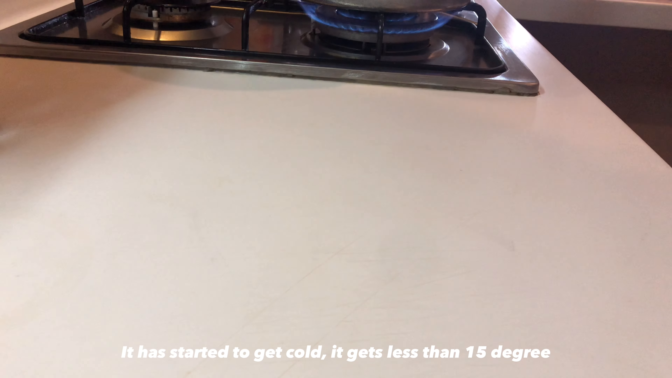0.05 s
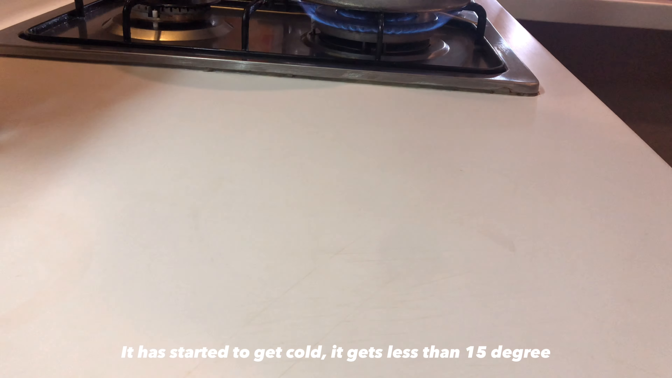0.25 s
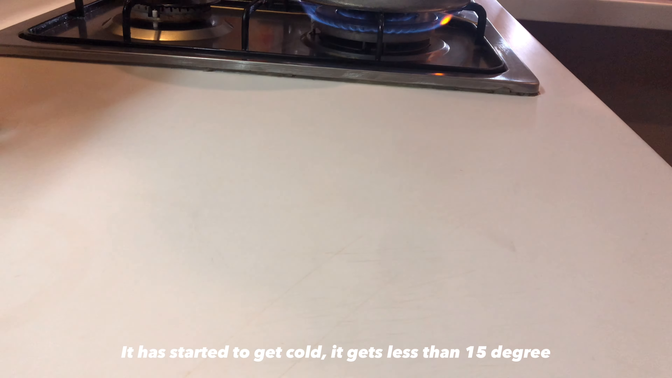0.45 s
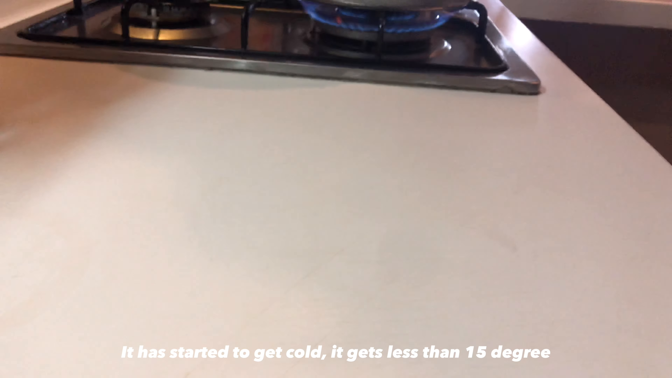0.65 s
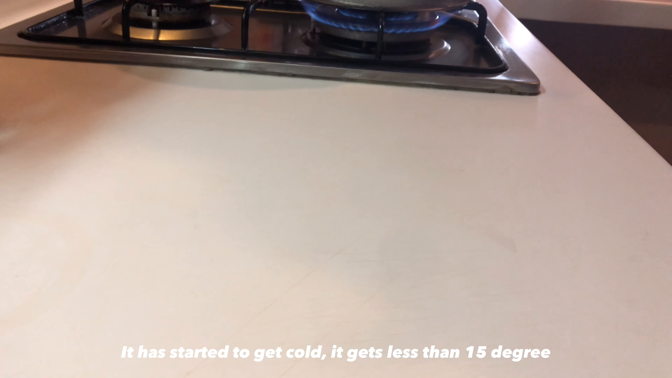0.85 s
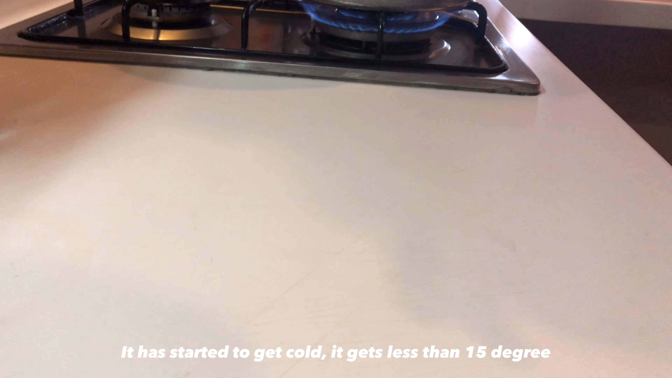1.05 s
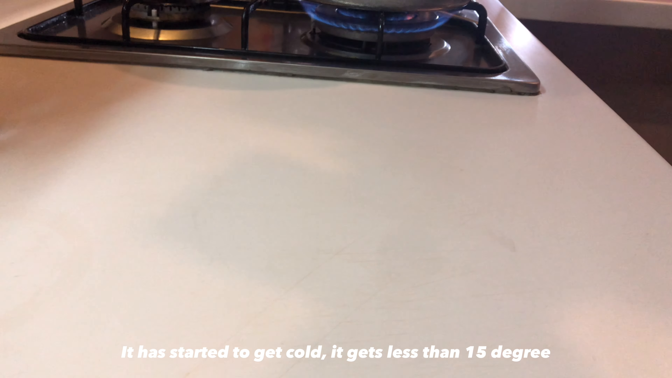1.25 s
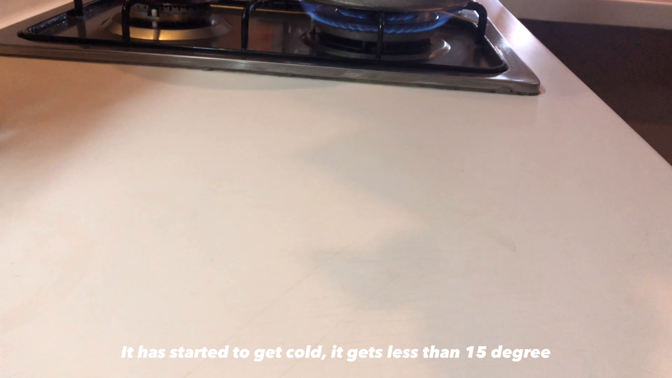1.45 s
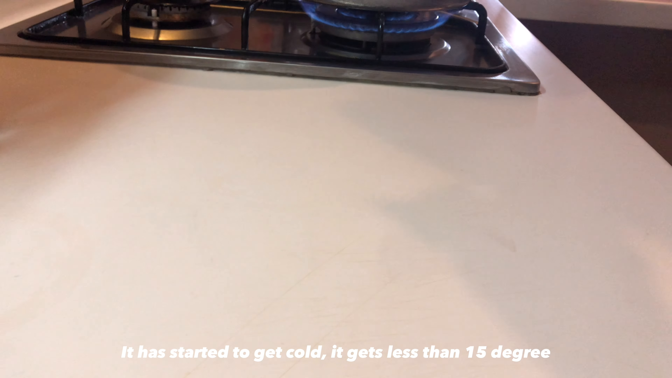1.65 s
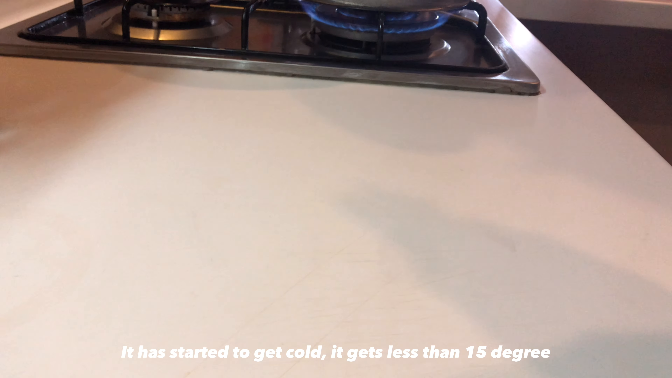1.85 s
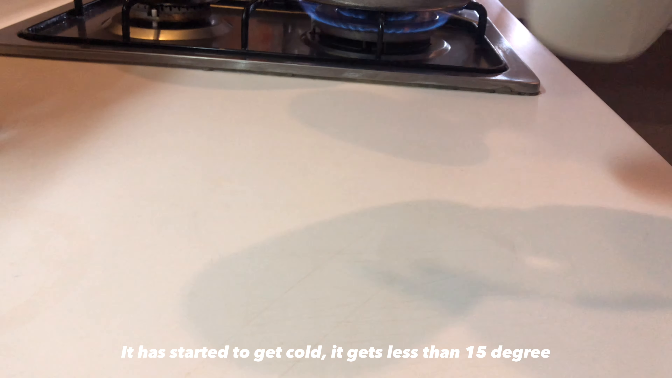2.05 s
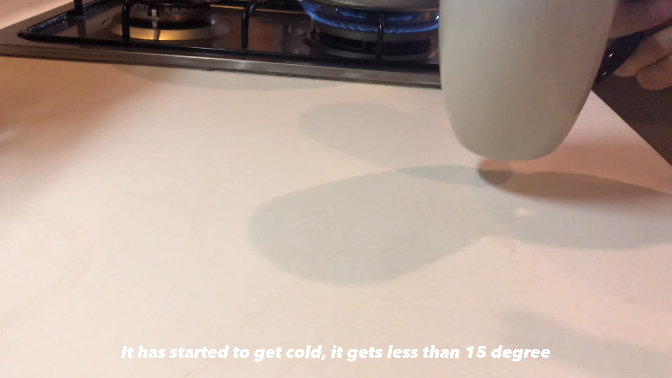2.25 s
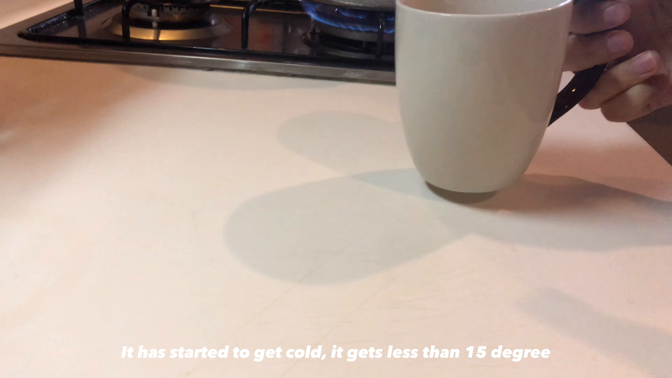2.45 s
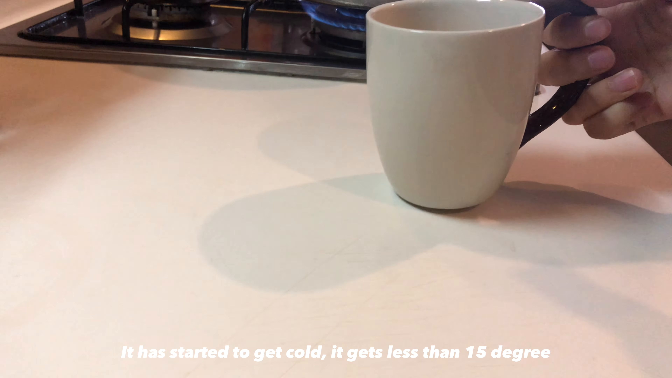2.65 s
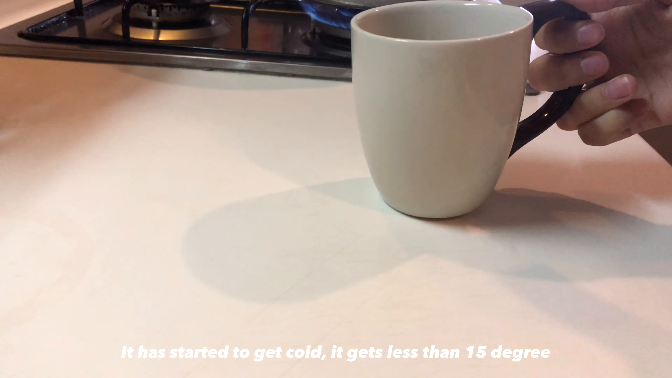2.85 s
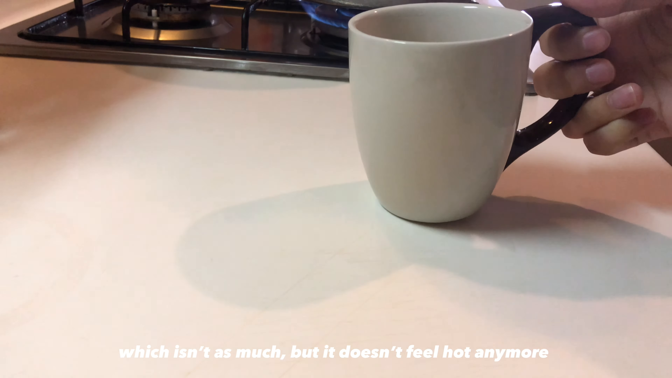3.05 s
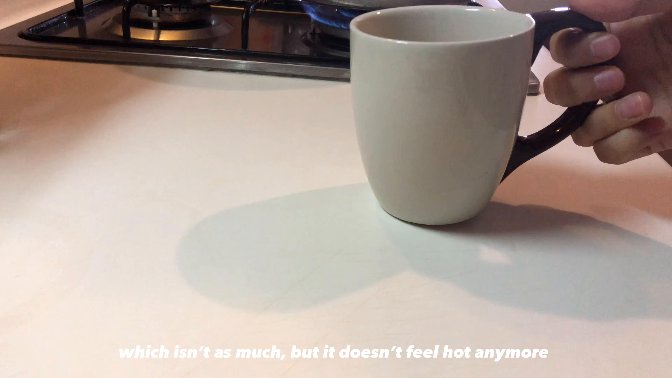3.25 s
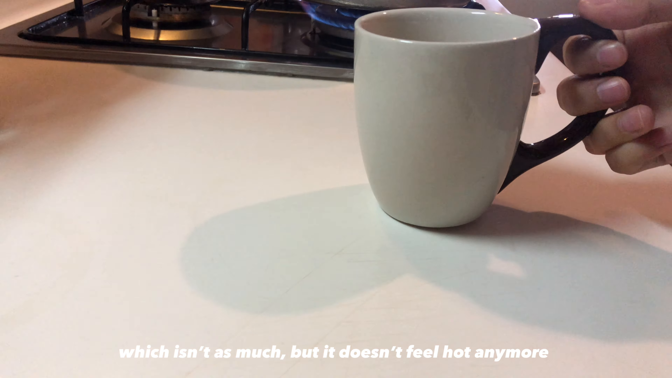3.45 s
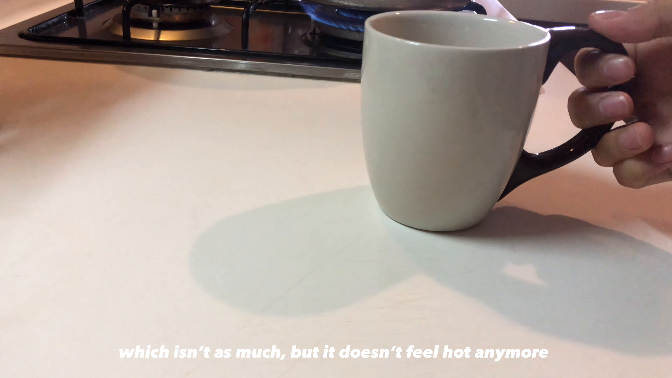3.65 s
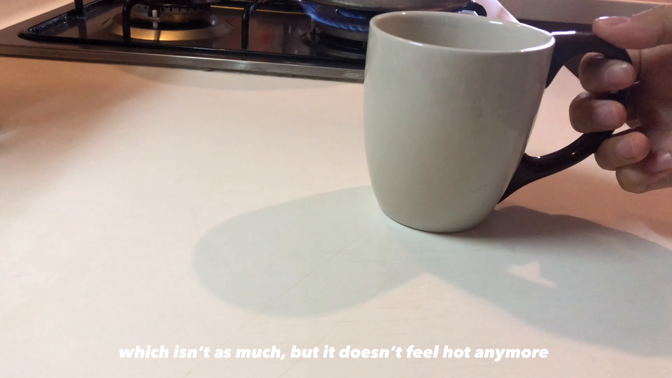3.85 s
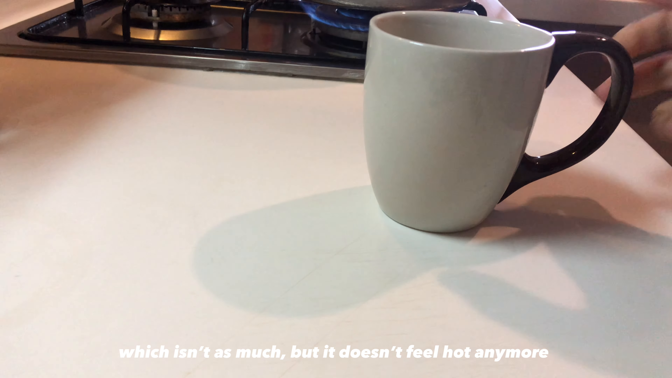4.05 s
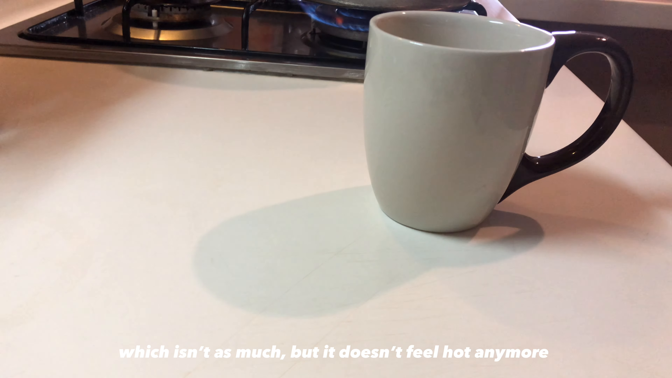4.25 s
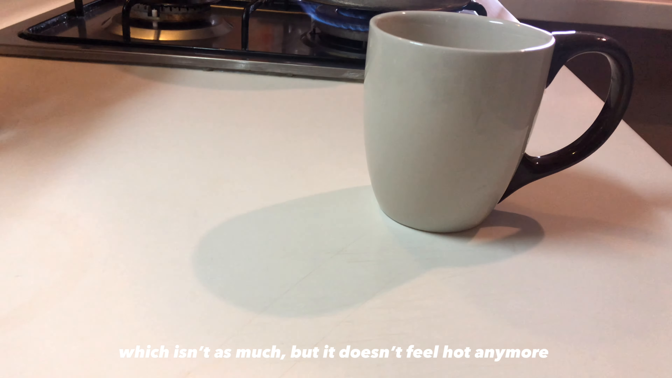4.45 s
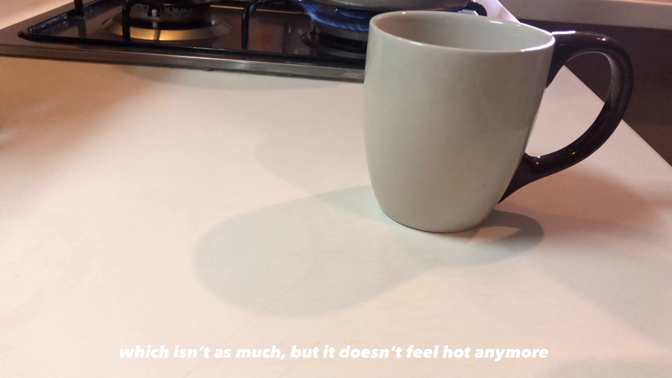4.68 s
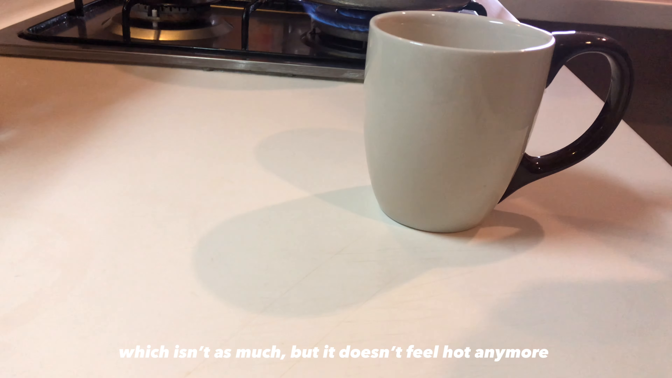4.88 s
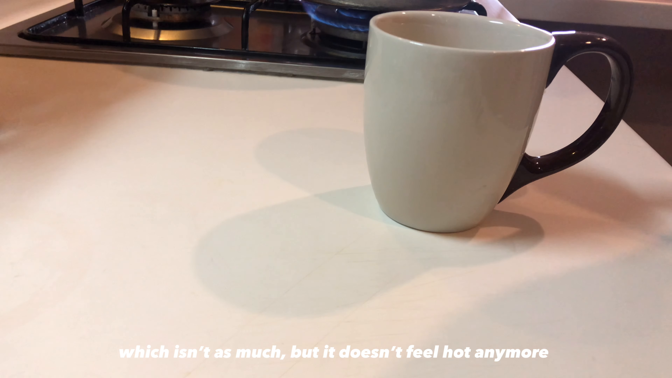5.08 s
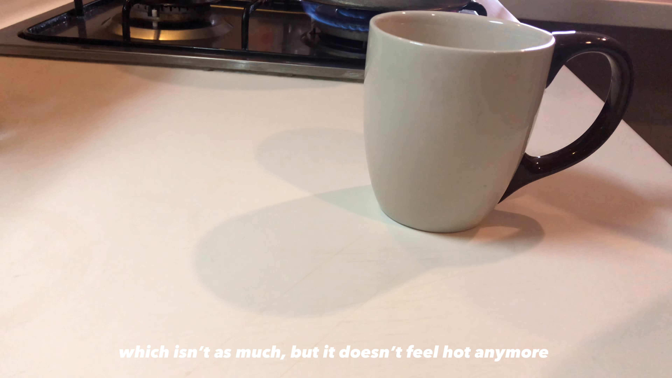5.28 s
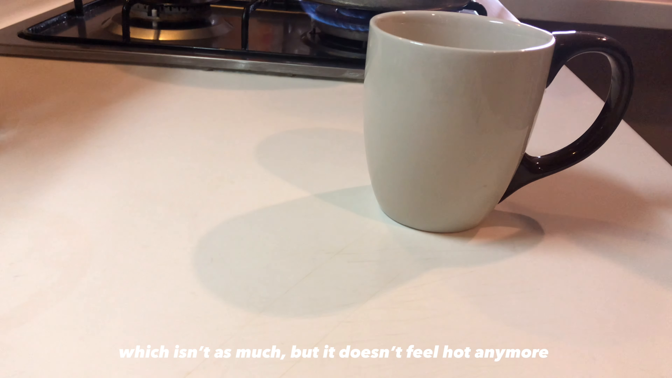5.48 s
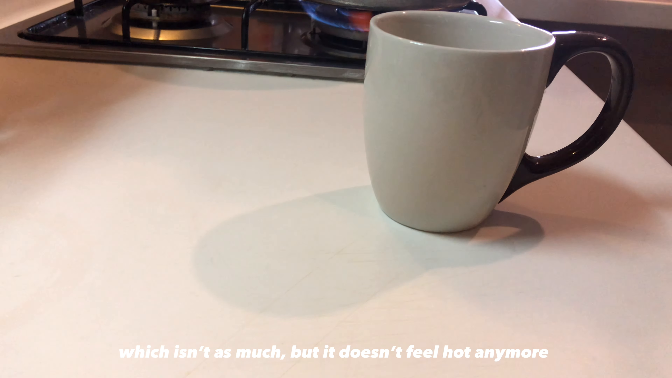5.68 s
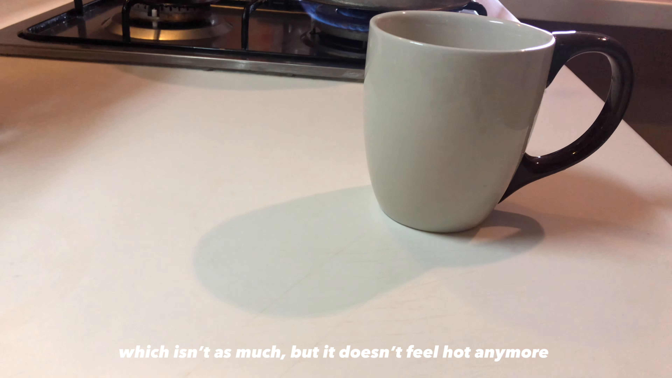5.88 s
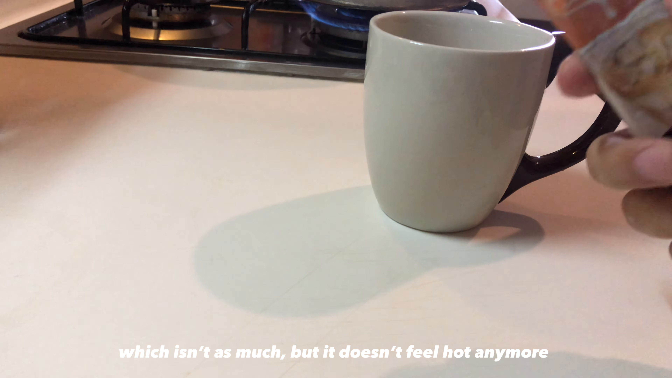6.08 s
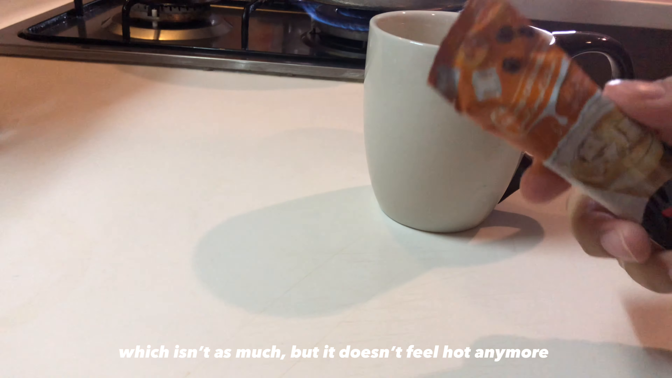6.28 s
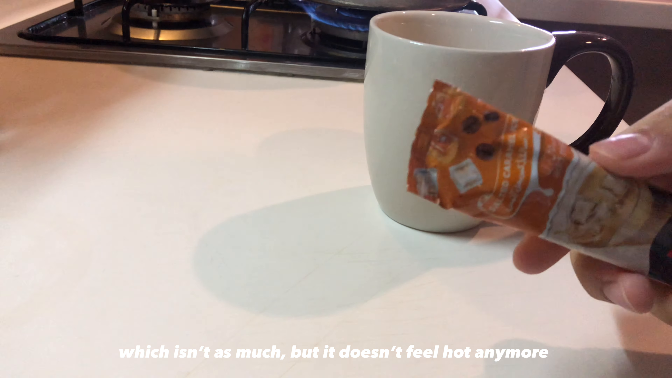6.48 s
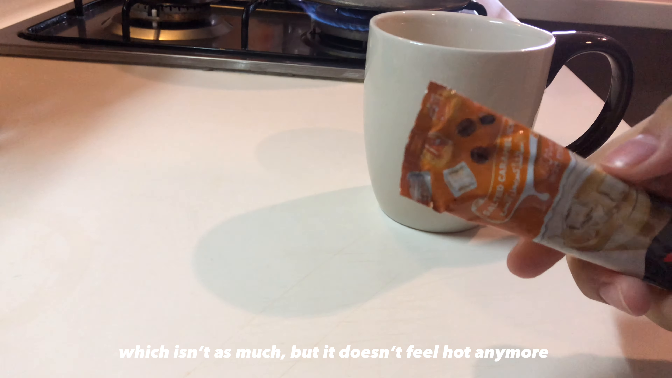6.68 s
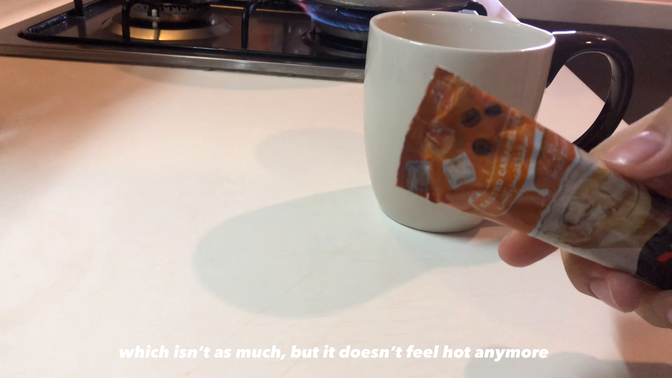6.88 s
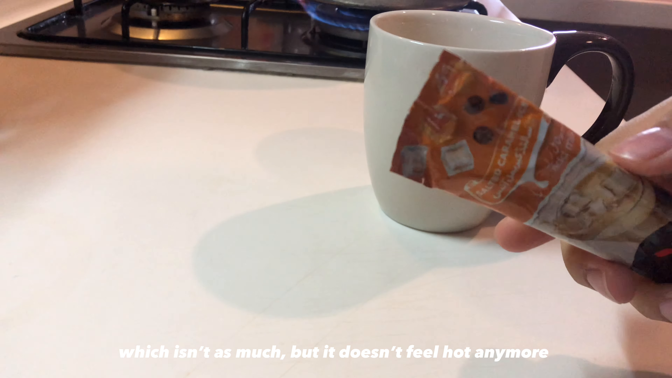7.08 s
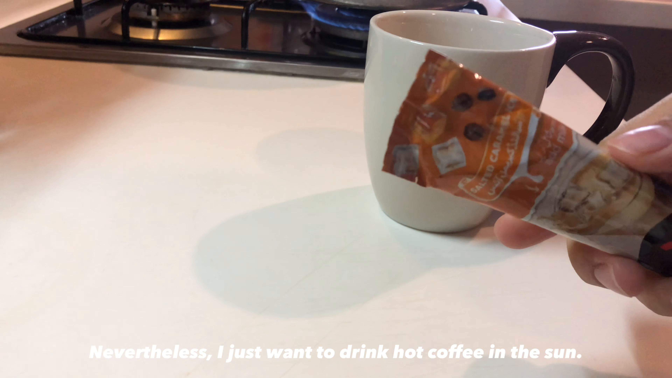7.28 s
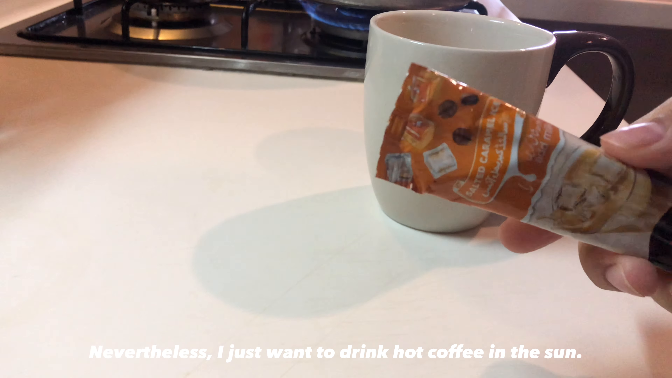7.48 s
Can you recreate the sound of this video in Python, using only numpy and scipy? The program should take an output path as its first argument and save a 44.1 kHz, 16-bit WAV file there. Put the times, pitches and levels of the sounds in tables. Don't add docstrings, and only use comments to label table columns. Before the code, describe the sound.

Close microphone on a kitchen counter, with a gas flame hissing evenly beyond it. Small crisp ticks and a dull knock lead to a mug's edge landing sharply, making the slab ring and the room answer briefly. Its whole base settles more quietly with a tiny bounce. Faint low bumps follow, then a crushed foil sachet crackles brightly in the hand and dwindles to occasional snaps.

```python
import sys
import numpy as np
from scipy import signal
from scipy.fft import rfft, irfft
from scipy.io import wavfile
from scipy.ndimage import uniform_filter1d

SR = 44100
rng = np.random.default_rng(int(sys.argv[2]) if len(sys.argv) > 2 else 0)


def how_loud(loudness_db):
    steps = np.asarray(loudness_db, float) / 20
    return 10 ** steps


def waveform_to_disk(signal):
    frames = np.transpose(np.atleast_2d(signal))
    scaled = np.clip(frames, -1, 1) * 32767
    samples = np.round(scaled).astype(np.int16)
    wavfile.write(sys.argv[1], SR, samples)


N = 331894

# f/Hz, t60/s
ROOM_DECAY = [(60, 0.97), (300, 0.89), (1000, 0.7), (2000, 0.33), (5000, 0.31), (12000, 0.23)]


def read(points, hz):
    f, value = np.transpose(points)
    return np.interp(np.log(hz + 1), np.log(f + 1), value)


def peak(hz, centre_hz, width_hz):
    return 1 / (1 + (2 * (hz - centre_hz) / width_hz) ** 2) ** 2


def add(mix, s, sound):
    part = mix[round(s * SR):][:len(sound)]
    part += sound[:len(part)]


def evened(x):
    return x / np.sqrt(np.mean(x ** 2) + 1e-20)


def coloured(noise, gain):
    return evened(irfft(rfft(noise) * gain, len(noise)))


def swelling_mode(t, db, hz, t60, rise_ms):
    rise = 1 - np.exp(-t * 1000 / rise_ms)
    return how_loud(db - 60 * t / t60) * rise * np.sin(2 * np.pi * hz * t)


def echoes(decays, gap_ms, size):
    spacing = 12
    taps = np.zeros(size)
    starts = np.arange(0, size - spacing, spacing)
    at = starts + rng.integers(0, spacing, len(starts))
    taps[at] = rng.choice([-1., 1.], len(at))
    hz, t, bands = signal.stft(taps, SR, nperseg=128)
    dying = bands * how_loud(-60 * t / read(decays, hz)[:, None])
    tail = signal.istft(dying, SR, nperseg=128)[1]
    return np.r_[np.zeros(round(gap_ms * SR / 1000)), tail / np.linalg.norm(tail)]


def burner():
    # f/Hz, density/dB per Hz
    jet_hiss = [(560, -29.0), (1400, -19.7), (2300, -18.7), (3600, -25), (4600, -16.5), (6000, -28.5),
                (7500, -23.0), (11000, -29.0), (13000, -28.5), (15700, -24.7)]
    # f/Hz, width/Hz, density/dB per Hz
    cap_modes = [(650, 151, -4.9), (803, 134, 0.6), (926, 131, 1.0), (1073, 86, -4.3), (1184, 153, -9.7),
                 (1567, 288, -12.4), (1797, 170, -15.7), (2081, 136, -12.6), (2627, 214, -6.2),
                 (3158, 77, -11.1), (3294, 190, -9.3), (4119, 141, -10.0), (4250, 65, -14.8),
                 (4746, 117, -12.7), (5047, 185, -7.6), (5236, 316, -15.3), (5449, 128, -17.5),
                 (6789, 138, -7.7), (6934, 172, -9.3), (8086, 635, -21.1), (8726, 166, -13.4),
                 (8941, 212, -13.4), (9620, 70, -5.5), (9917, 786, -20.4), (10611, 275, -21.8),
                 (11521, 1305, -25.1), (12202, 307, -16.3), (13930, 271, -18.6), (14272, 296, -18.5),
                 (15584, 192, -16.6)]
    # f/Hz, density/dB per Hz
    flame_rumble = [(20, -40), (33, -30), (39, -1), (48, -6), (72, -6.5), (100, 5), (125, 9), (150, -7),
                    (175, -9.5), (250, -5), (330, -8), (430, -11.5), (560, -15.5), (700, -20)]
    # f/Hz, level/dB rms
    mains = [(50, -71.5), (100, -75.5), (200, -74), (301, -68.5)]
    # t/s, hiss/dB, rumble/dB
    draw = [(0.0, 0.5, 1), (7.52, -0.5, 1.5)]
    # t/s, level/dB
    shade = [(0, 0.5), (.9, 1), (1.5, 2), (2.3, 0.5), (2.8, -2), (3.8, -2.5), (4.4, -1), (5.5, -1),
             (7.52, -1)]
    t, hz = np.arange(N) / SR, np.fft.rfftfreq(N, 1 / SR)
    draw_s, hiss_db, rumble_db = np.transpose(draw)
    jet_noise, flame_noise, flutter_noise = rng.standard_normal((3, N))

    power = how_loud(read(jet_hiss, hz)) ** 2 * (hz > 300)
    power = power + sum(how_loud(db) ** 2 * peak(hz, f, width) for f, width, db in cap_modes)
    power = power / (1 + (hz / 15780) ** 1200)
    steady = rfft(jet_noise) * np.sqrt(power)
    middle = irfft(steady * peak(hz, 5200, 3000), N)
    shaded = middle * (how_loud(np.interp(t, *np.transpose(shade))) - 1)
    flutter = coloured(flutter_noise, 1 / (1 + (hz / 9) ** 2))
    hiss = (irfft(steady, N) + shaded) * how_loud(np.interp(t, draw_s, hiss_db) + 0.29 * flutter)

    rumble = irfft(rfft(flame_noise) * how_loud(read(flame_rumble, hz)) * (hz < 800), N)
    rumble = rumble * how_loud(np.interp(t, draw_s, rumble_db))
    hum = sum(how_loud(db) * np.sqrt(2) * np.sin(2 * np.pi * (f * t + rng.random())) for f, db in mains)
    burner_db = -80
    return how_loud(burner_db) * np.sqrt(SR / 2) * (hiss + rumble) + hum


def rustle():
    # t/s, level/dB, half length/s
    squeezes = [(.3, -63, 0.25), (2.125, -61.5, 0.18), (2.42, -59.5, 0.083), (4.406, -61, .07),
                (4.6, -59, 0.16), (4.692, -48.5, 0.035), (4.828, -52.5, 0.15), (5.02, -60, .08),
                (5.087, -53.5, 0.077), (5.273, -60, .1), (5.425, -58, .07), (5.65, -62, 0.11),
                (5.96, -61.5, 0.14), (6.45, -72, .15)]
    t, out, level = np.arange(N) / SR, np.zeros(N), np.zeros(N)
    fade_db = -8.5
    for s, db, half in squeezes:
        level = np.maximum(level, how_loud(db + fade_db * abs(t - s) / half))
    creases_per_s = 2500
    size = how_loud(2.0 * np.minimum(rng.exponential(1, N), 4)) * (rng.random(N) < creases_per_s / SR)
    pitch = rng.integers(0, 12, N)
    grain_t = t[:128]
    for k, hz in enumerate(np.geomspace(1700, 13000, num=12)):
        grain = np.sin(2 * np.pi * hz * grain_t) * np.exp(-grain_t * hz / 0.57)
        grain = grain * (hz / 1700) ** 0.091
        out += signal.oaconvolve(size * (pitch == k), grain)[:N]
    return level * evened(out)


def creases():
    # t/s, level/dB, lower facet f/Hz, treble/dB, length/ms
    stray = [(0.4754, -38, 3000, -22, 2.9), (1.181, -40, 2520, -17, 2.5), (1.6098, -31, 5050, -15, 0.8),
             (1.6368, -35, 2000, -32, 0.63), (1.6409, -31, 1750, -34, 0.77), (2.135, -45, 2000, -25, 1.5),
             (2.1842, -33.5, 3180, -13.5, 2.4), (2.2739, -28, 2300, -38, 0.98),
             (2.549, -33, 1755, -25, 8.5), (4.266, -42, 2170, -36, 1.9), (4.4203, -46, 6000, -7, 2.7),
             (4.6514, -19.5, 4180, -19, 1.15), (4.8436, -35, 8250, -16, 1.2), (5.0482, -41, 6300, -13, 2.2),
             (5.052, -43, 1770, -21, 2.4), (5.0598, -32, 4600, -15, 0.97), (5.2421, -39, 4050, -18, 1.4),
             (5.4902, -39, 1980, -30, 0.89), (5.656, -47, 3700, -11, 6.5), (5.8278, -39, 3500, -22, 2.4),
             (5.9236, -44, 4900, -9, 2.8), (6.339, -36, 3220, -19, 0.6), (6.4977, -38, 3630, -17, 0.97),
             (7.5105, -39.5, 1570, -20, 1.9)]
    # t/s, level/dB, upper facet f/Hz, treble/dB, length/ms
    folded = [(0.0728, -28.5, 3330, -40, 0.8), (0.341, -40.5, 5200, -15, 2.2),
              (1.6476, -35, 4850, -27, 1.8), (2.3221, -27.5, 4400, -30, 1.25),
              (2.5495, -25, 5080, -13, 2.3), (2.7142, -31.5, 6100, -33, 2.7),
              (3.582, -34.5, 2060, -27, 2.2), (4.406, -34, 5270, -22, 0.95), (4.4122, -39, 3980, -28, 3.2),
              (5.0322, -34, 2400, -29, 0.98), (5.0833, -25.5, 6700, -10, 1.4),
              (5.2793, -35.5, 4480, -16, 1.3), (5.4066, -35, 2240, -31, 0.9), (5.4142, -28, 4180, -23, 1.9),
              (5.8722, -41, 5200, -31, 1.5), (5.9426, -25.5, 5130, -19, 0.69),
              (6.4046, -34, 4900, -12, 1.5)]
    # t/s, level/dB, upper facet f/Hz, treble/dB, length/ms
    crushed = [(4.4987, -28.5, 2260, -23, 2.2), (4.5335, -25, 5280, -21, 2.2), (4.54, -34, 5200, -21, 3.7),
               (4.5688, -24.5, 5700, -7.5, 1), (4.6136, -24.5, 4420, -13.5, 1.7),
               (4.663, -28.5, 2760, -26, 1.1), (4.667, -29, 4770, -26, 1.3), (4.6777, -29, 4330, -24, 1.8),
               (4.6851, -27.5, 3240, -27, 1.5), (4.691, -30, 3800, -29, 1.4), (4.7462, -36, 5560, -20, 2.1),
               (4.7519, -20, 2420, -21, 3.4), (4.7543, -39, 2290, -23, 5.7), (4.7872, -27, 4700, -22, 1.4),
               (4.799, -20.5, 4840, -21, 0.62), (4.806, -29, 4300, -18, 2.6), (4.81, -33, 2500, -18, 2.4),
               (4.826, -39, 3820, -17, 3.4), (4.839, -28.5, 4700, -23, 0.89), (4.878, -27, 2110, -25, 1.1),
               (4.88, -30, 4200, -18, 3.9), (5.0929, -25, 4570, -23, 1.4), (5.098, -31, 5240, -18, 2.5),
               (5.829, -22, 8030, -12.5, 1.8)]
    # t/s, level/dB, upper facet f/Hz, treble/dB, length/ms
    trailing = [(.9608, -30, 4800, -24, .6), (2.3225, -37, 7500, -27, 1.2), (2.5513, -31, 3500, -10, 1.2),
                (3.98, -45, 2400, -22, 1.6), (4.507, -35, 2210, -30, 1.5), (4.5318, -30, 4700, -22, 1.8),
                (4.535, -29, 1900, -22, 1.2), (4.5774, -38, 2430, -26, 1.4), (4.6158, -39, 1900, -17, 1.1),
                (4.6945, -36, 1690, -24, 1.6), (4.7612, -42, 5600, -9, 1.5), (4.7978, -31, 2400, -22, 1.3),
                (4.8134, -34, 4740, -26, 1.4), (4.8277, -37, 1740, -18, 1.8), (4.838, -29, 6460, -22, .9),
                (4.8874, -39, 4500, -22, 1.4), (5.007, -44, 3870, -26, 1.7), (5.0436, -41, 6700, -24, 1.4),
                (5.082, -37, 4940, -17, 1.2), (5.0838, -28.5, 8650, -8.5, 1.1),
                (5.0953, -29.5, 2790, -24, 1.6), (5.1008, -40, 4980, -18, 1.4),
                (5.8272, -43, 4200, -12, 1.1), (5.8326, -43, 7200, -16, 1.4), (7.2318, -52, 1390, -26, 1.6),
                (.476, -44, 1400, -30, 2.5), (2.0995, -42, 5000, -12, 1.2), (5.645, -46, 3500, -14, 5),
                (2.1225, -44, 2700, -20, 1.5), (2.411, -45, 6200, -14, 1.5), (2.443, -44, 2600, -22, 1.5),
                (5.037, -46, 6900, -18, 1.2)]
    rows = []
    for table, facet_ratio in ((stray, 1.57), (folded, 0.636)):
        for s, db, f, treble_db, ms in table:
            rows.append((s, db, f, facet_ratio * f, treble_db, ms))
    panel_hz = 1695
    for s, db, f, treble_db, ms in crushed + trailing:
        rows.append((s, db, f, max(0.421 * f, panel_hz), treble_db, ms))
    return rows


def snap(row, noise):
    # f as a factor on it, level/dB
    onset = [(.35, -32), (.7, -23), (1.1, -9.5)]
    db, f, g, treble_db, ms = row
    t, hz = np.arange(512) / SR, np.fft.rfftfreq(512, 1 / SR)
    u = t / (ms / 1000)

    lowest_hz = min(f, g, 2600)
    points = [(k * lowest_hz, d) for k, d in onset]
    points += [(9000, treble_db + 4.0), (13000, treble_db - .4), (16500, treble_db), (16900, -70)]
    broad = how_loud(read(points, hz))
    shape = (1 - np.exp(-u / 0.38)) * np.exp(-2.6 * u)
    burst = shape * noise[0]
    lumps = np.sqrt(uniform_filter1d(abs(rfft(burst)) ** 2, size=15) + 1e-9)
    crack = coloured(burst, broad / lumps) * np.sqrt(np.mean(broad ** 2) * np.mean(shape ** 2))

    drift = np.sqrt(2 * np.pi * .015 * np.array([[f], [g]]) / SR)
    waver = np.cumsum(uniform_filter1d(noise[1:], 9), axis=1) * drift
    waver = waver + 3 * noise[1:, :1]
    facets = np.sin(2 * np.pi * f * t + waver[0])
    facets = facets + how_loud(-4.5) * np.sin(2 * np.pi * g * t + waver[1])
    ring = (1 - np.exp(-u / 0.37)) * np.exp(-2.6 * t / (ms / 1000 + 0.5 / f))
    return how_loud(db + 5.5) * (ring * facets + how_loud(13.5) * crack)


def ping(db, hz, ms):
    t = np.arange(1024) / SR
    swell = 1 - np.exp(-t * abs(hz) / 0.91)
    return how_loud(db + 1 - 20 * t * 1000 / ms) * swell * np.sin(2 * np.pi * hz * t)


def sachet():
    # t/s,
    # level/dB, f/Hz (negative: first swings inward), length/ms
    lone_rings = [(2.1842, -38, 2900, 3), (2.5494, -31, 5820, 3.5), (4.2662, -42, 2170, 3),
                  (4.4128, -41, 4200, 3), (4.4988, -35, 3420, 2.7), (4.569, -30, 4770, 2),
                  (4.6514, -25, 5000, 2.5), (4.6662, -39, 5900, 2), (4.666, -33, 4300, 2),
                  (4.6778, -40, 6200, 2), (4.6908, -41, 4700, 2), (4.695, -43, 4500, 2),
                  (4.7595, -38, 2410, 5), (4.767, -38, 2400, 9), (4.776, -44, 1690, 7),
                  (4.7872, -32, 2400, 2.5), (4.7988, -35, 2550, 2.5), (4.849, -42, 1750, 4),
                  (4.8775, -38, 6300, 2), (4.8808, -37, 6400, 2), (5.0598, -46, 1700, 3),
                  (5.083, -37, 1750, 3.5), (5.093, -36, 3300, 2), (5.4143, -46, 1700, 3),
                  (5.49, -43, 2000, 2.5), (5.8277, -28, 3420, 2), (5.9425, -38, 10500, 1.5),
                  (7.232, -35, -1400, 2.5), (7.511, -41, 3900, 2.5), (1.6102, -41, 6000, 3),
                  (5.2418, -40, 6200, 2), (4.8062, -30, 1810, 4), (4.5074, -43, 2250, 5),
                  (4.5775, -43, 2450, 3), (.9612, -42.5, 4790, 9), (5.0965, -39, 2000, 4),
                  (4.753, -32, 1700, 6), (5.8288, -39, 2400, 2), (6.4046, -46, 2500, 2),
                  (4.5692, -37, 6200, 2), (4.577, -46, 6200, 3), (4.685, -41, 5600, 2),
                  (4.6906, -42, 6200, 2), (5.06, -43, 2500, 2), (5.06, -41, 6300, 1.5),
                  (5.9242, -45, 7600, 2), (6.4046, -40, 6000, 2), (.258, -36, 570, 13),
                  (.273, -43, 340, 20)]
    # f/Hz, t60/s
    near_decay = [(1500, 0.053), (5000, 0.053), (12000, 0.06)]
    spots = np.zeros((4, N))
    spots[0] = rustle()
    lead_s = .0003
    snaps = creases()
    noises = rng.standard_normal((len(snaps), 3, 512))
    for k, ((s, *row), noise) in enumerate(zip(snaps, noises)):
        add(spots[k % len(spots)], s - lead_s, snap(row, noise))
    for k, (s, *row) in enumerate(lone_rings):
        add(spots[k % len(spots)], s - lead_s, ping(*row))
    direct = spots.sum(0)
    near = sum(signal.oaconvolve(spot, echoes(near_decay, 1.57, size=6000))[:N] for spot in spots)
    room = signal.oaconvolve(direct, echoes(ROOM_DECAY, 8.0, size=16000))[:N]
    return direct + how_loud(-6.5) * near + how_loud(-16.0) * room


def knocks():
    # t/s,
    # level/dB, centre f/Hz, width/Hz, t60/s
    blows = [(0.2552, -36, 570, 140, 0.034), (0.254, -42.5, 1100, 1500, 0.043), (0.258, -45, 334, 170, 0.2),
             (0.9604, -39, 3200, 4600, 0.072), (0.9602, -46, 4800, 440, .06), (0.961, -46, 2800, 400, 0.14),
             (0.965, -48.5, 1350, 460, 0.34), (.968, -48, 2300, 3600, 0.5), (3.757, -51, 1200, 700, 0.3),
             (3.9885, -41.5, 480, 356.4, 0.12), (4.014, -39.5, 223, 90, 0.093), (5.2, -46, 85, 40, .07),
             (4.24, -44.5, 120, 30, 0.14), (5.825, -45.5, 470, 150, 0.098), (7.232, -58, 1360, 500, 0.037)]
    # t/s, level/dB, centre f/Hz, width/Hz, t60/s
    shuffles = [
        (.31, -48, 590, 920, 0.48),
        (.385, -43, 300, 350, 0.24),
        (0.974, -43, 116, 53, 0.63),
        (.965, -46, 300, 440, 0.6),
        (4.66, -48.5, 410, 280, 0.83),
    ]
    # t/s, level/dB, f/Hz, t60/s, rise/ms
    cupboard = (3.9205, -40, 60, .45, 6)
    size = 16384
    out, t, hz = np.zeros(N), np.arange(size) / SR, np.fft.rfftfreq(size, 1 / SR)
    rows = [(*row, min(1000 * 1.8 / row[2], 4.6)) for row in blows]
    rows += [(*row, 26) for row in shuffles]
    for s, db, f, width, t60, rise_ms in rows:
        shape = (1 - np.exp(-t * 1000 / rise_ms)) * how_loud(db - 60 * t / t60)
        band = coloured(rng.standard_normal(size), np.sqrt(peak(hz, f, width)))
        add(out, s, evened(shape * band) * np.sqrt(np.mean(shape ** 2)))
    s, *mode = cupboard
    add(out, s, swelling_mode(t, mode[0], mode[1], mode[2], mode[3]))
    return out


def mug():
    # t/s, clack level/dB, clack f/Hz, room level/dB, room brightness/dB per octave
    landings = [
        (2.7294, -12.5, 907, -26.5, 2),
        (3.7494, -18.5, 887, -32.5, 3),
        (3.755, -25, 854, -55, -5),
    ]
    # f/Hz (negative: first swings inward), level/dB, t60/s, rise/ms
    slab = [
        [(59, -35, 0.33, 27), (104, -27.5, 0.13, 7.5), (147, -28, 0.11, 8.4), (201, -34, 0.14, 5),
         (286, -42, 0.22, 4.8), (335, -23, 0.17, 3.3), (-450, -18, 0.03, 2), (500, -30, 0.15, 3),
         (586, -26, 0.079, 2.7), (1240, -20.5, 0.032, 1.3), (1564, -36, 0.038, .8), (2297, -31.5, 0.017, 0.21),
         (2700, -36, 0.015, .3), (3980, -45, 0.0096, .15)],
        [(61, -49, .3, 15), (135, -40, 0.29, 6), (203, -39, 0.15, 6.2), (330.5, -32.5, 0.26, 3.6),
         (343.5, -33, 0.31, 3.4), (-427, -29.5, 0.068, 3), (530, -26, 0.068, 3.3), (700, -32, 0.11, 2.5),
         (872, -33, 0.077, 3.5), (1227, -35, 0.036, 1.1), (1440, -33, 0.034, 0.49), (1680, -33, 0.028, .8),
         (2300, -39, 0.016, 0.41), (2640, -44, 0.023, 0.37)],
        [],
    ]
    # delay/ms, level/dB
    walls = [(36, -28), (51, -33), (62, -30)]
    # f/Hz, level/dB
    thud = [(40, -35), (70, 12), (150, 4), (330, 6.5), (600, -2), (950, -2), (1400, -8.5), (2000, -20),
            (3000, -45), (5000, -60)]
    out, t = np.zeros(N), np.arange(SR) / SR
    clack_cycles = 5.1
    for (s, db, f, room_db, tilt_db), modes in zip(landings, slab):
        u = np.minimum(t * f / clack_cycles, 1)
        turns = f * t + .8 * (1 - np.exp(-t / .00045))
        clack = how_loud(db) * np.sin(np.pi * u ** 0.76) ** 0.82 * np.sin(2 * np.pi * turns)
        add(out, s, clack)
        for late_ms, wall_db in walls:
            add(out, s + late_ms / 1000, how_loud(wall_db) * clack)
        for hz, mode_db, t60, rise_ms in modes:
            add(out, s, swelling_mode(t, mode_db, hz, t60, rise_ms))
        tail = echoes(ROOM_DECAY, 0, size=30000)
        hz = np.fft.rfftfreq(len(tail), 1 / SR)
        tail = coloured(tail, how_loud(read(thud, hz) + tilt_db * np.log2(hz / 500 + .05)))
        swell = 1 - np.exp(-t[:len(tail)] / 0.0021)
        add(out, s + 0.004, how_loud(room_db - 19.5) * tail * swell)
    return out


def scene():
    return (burner() + sachet() + knocks() + mug())[None]


def low_pass(x):
    return signal.sosfilt(signal.butter(12, 16680, fs=SR, output="sos"), x)


def record(dry):
    x = signal.sosfilt(signal.butter(6, 38, "high", fs=SR, output="sos"), dry)
    edge_hz, top_db = 15840, -31
    lowpass = signal.firwin(1023, edge_hz, window=("kaiser", 9), fs=SR)
    below = signal.oaconvolve(x, lowpass[None], "same")
    return low_pass(below + how_loud(top_db) * (x - below))


dry = scene()
out = record(dry)
waveform_to_disk(out)
```